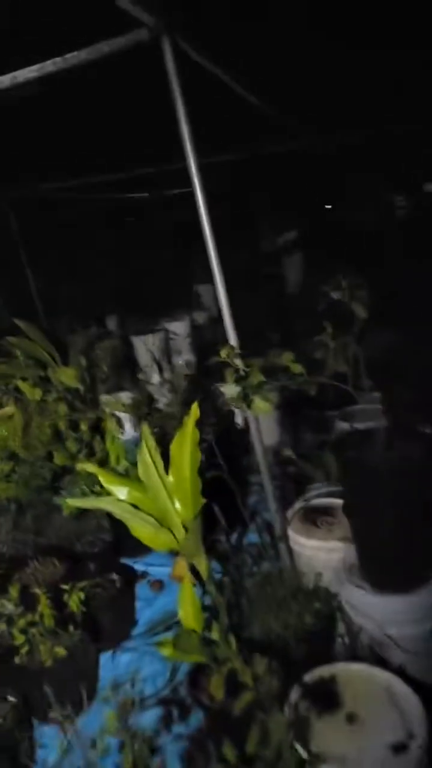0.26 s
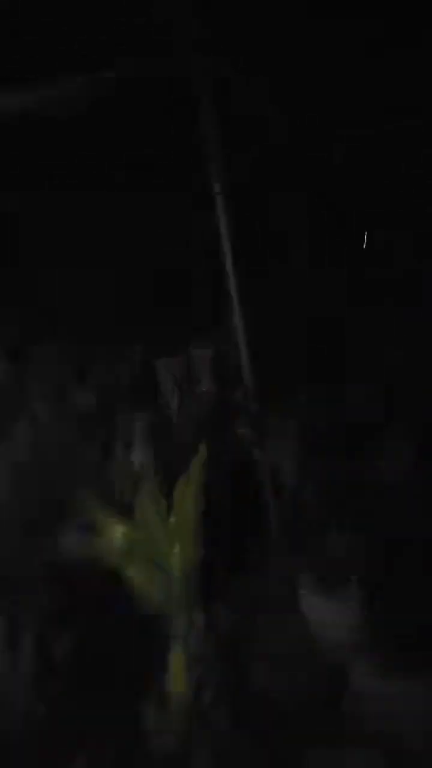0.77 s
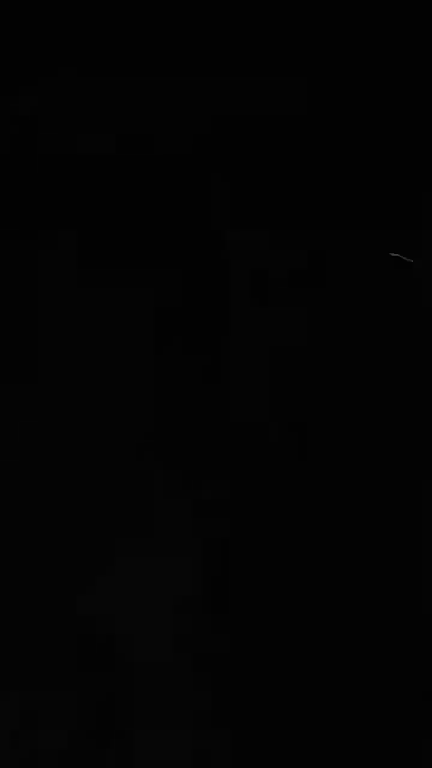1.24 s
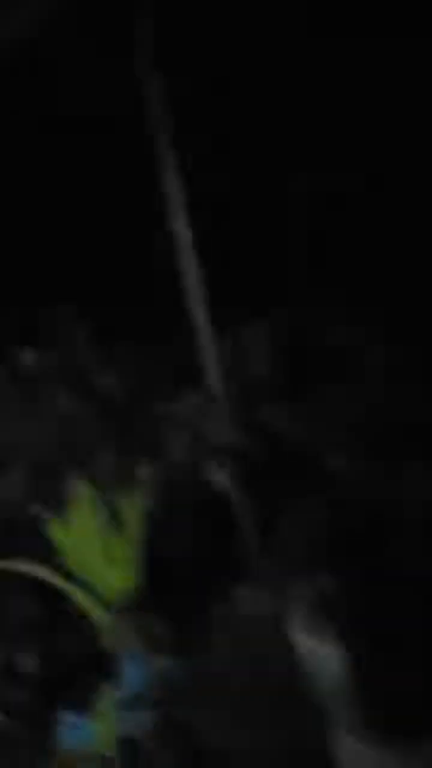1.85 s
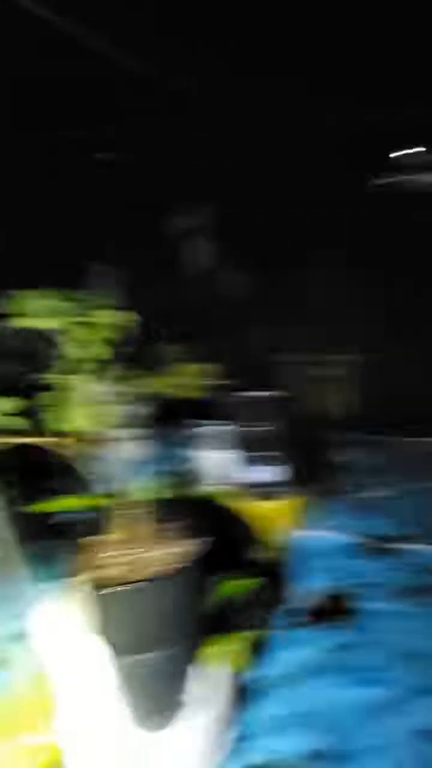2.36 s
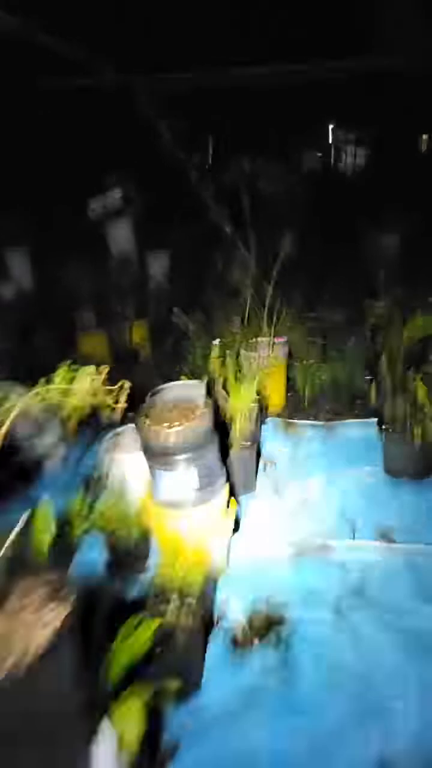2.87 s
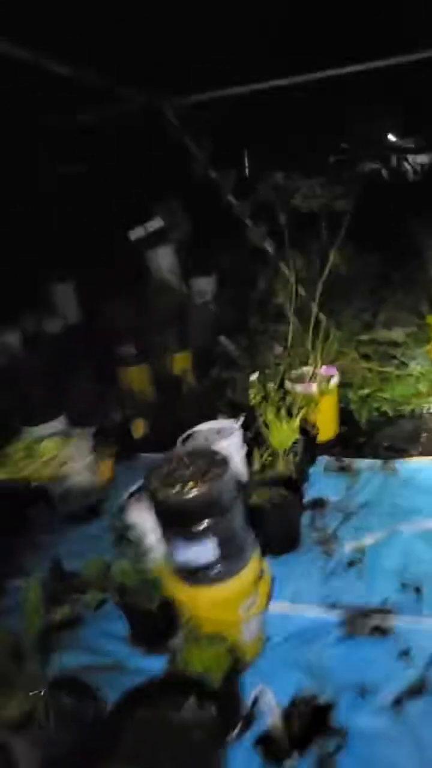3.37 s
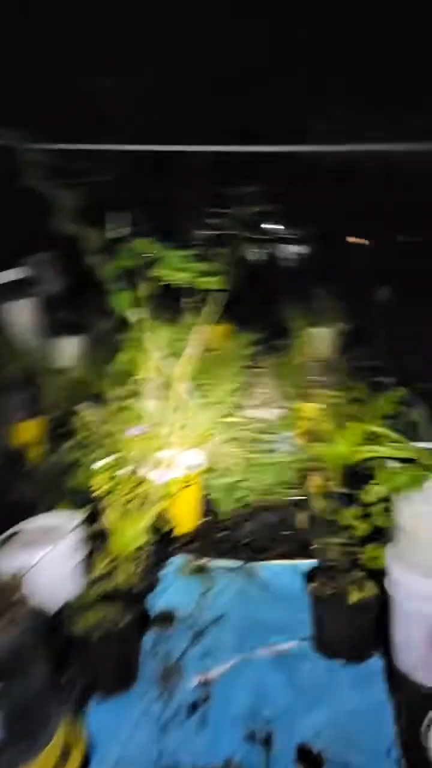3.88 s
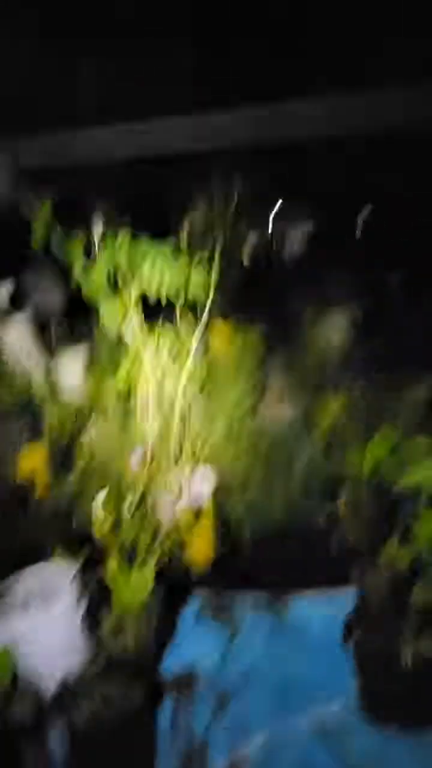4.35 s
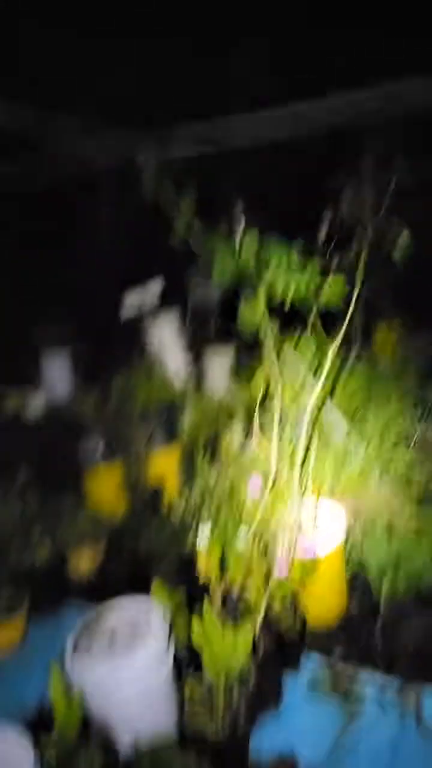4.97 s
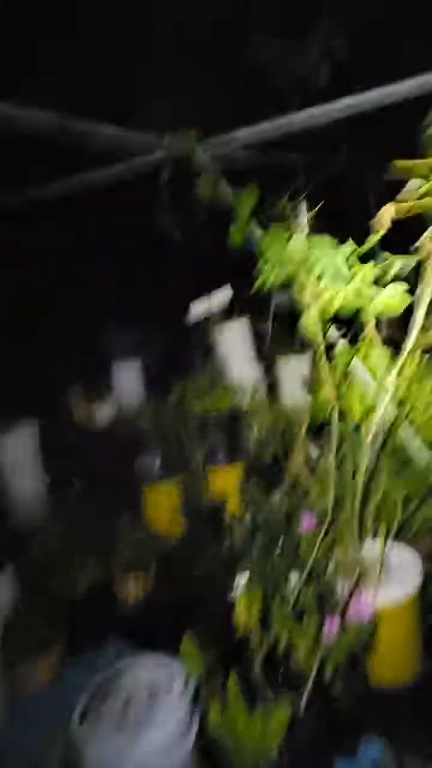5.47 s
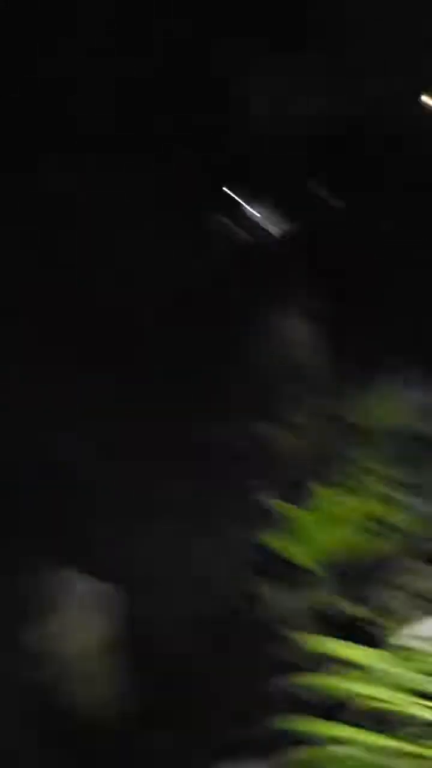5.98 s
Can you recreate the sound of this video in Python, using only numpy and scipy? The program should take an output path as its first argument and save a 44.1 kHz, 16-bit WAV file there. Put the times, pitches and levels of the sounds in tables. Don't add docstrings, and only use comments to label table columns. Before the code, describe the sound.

Outdoors at night, low falling and high rising frog notes ring over shimmering crickets as footsteps crumple plastic sheeting and dry weeds, growing heavier.

```python
import sys
import numpy as np
from scipy import signal
from scipy.fft import rfft, irfft, next_fast_len
from scipy.io import wavfile
from scipy.ndimage import uniform_filter1d, map_coordinates

SR = 44100
rng = np.random.default_rng(int(sys.argv[2]) if len(sys.argv) > 2 else 0)


def master_out(mix):
    frames = np.transpose(np.atleast_2d(mix))
    ceiling = np.clip(frames, -1, 1)
    pcm = np.round(ceiling * 32767).astype(np.int16)
    wavfile.write(sys.argv[1], SR, pcm)


def boost_factor(decibels):
    exponent = np.asarray(decibels, float) / 20
    return 10 ** exponent


N = 274302


def unit(x):
    return x / np.sqrt(np.mean(x ** 2) + 1e-20)


def along(points, hz):
    f, v = np.transpose(points)
    return np.interp(np.log(hz + 1), np.log(f + 1), v)


def curves(rows):
    s, *columns = np.transpose(rows)
    return [np.interp(np.arange(N) / SR, s, column) for column in columns]


def wobble(rate):
    coarse = np.arange(0, N + 32, 32)
    knots = rng.standard_normal(int(N * rate / SR) + 4)
    return np.interp(np.arange(N), coarse, map_coordinates(knots, [coarse * rate / SR]))


def coloured(x, spectrum):
    m = next_fast_len(N + 8192)
    gain = boost_factor(along(spectrum, np.fft.rfftfreq(m, 1 / SR)))
    return unit(irfft(rfft(x, m) * gain, m)[:N])


def laid(starts, rows):
    first = np.round(starts * SR).astype(int)[:, None] - 1
    at = np.clip(first + np.arange(rows.shape[1]), -1, N) % (N + 1)
    return np.bincount(at.ravel(), rows.ravel(), N + 1)[:N]


# frequency in Hz, 60 dB decay time in seconds.
DECAY = [(500, 0.39), (1700, 0.37), (3000, 0.45), (8000, 0.21)]


def garden(x, wet_db):
    out, block = x.copy(), SR // 2
    for start in range(0, N, block):
        hz, t, z = signal.stft(rng.standard_normal(block), SR, nperseg=256)
        decay = boost_factor(-60 * t / along(DECAY, hz)[:, None])
        tail = signal.istft(z * decay, SR, nperseg=256)[1]
        tail = tail / np.linalg.norm(tail)
        wet = signal.fftconvolve(x[start:start + block], tail)[:N - start]
        out[start:start + len(wet)] += boost_factor(wet_db) * wet
    return out


# time in seconds, level in dB.
RUMBLE = [
    (0.0, -50.5),
    (0.43, -49.5),
    (2.82, -53),
    (4.88, -49),
    (6.22, -53.5),
]
# frequency in Hz, level in dB per Hz.
TOWN = [(12, -63), (20, -32), (24, -58), (35, -17.5), (59, 1.5), (92, -7.5), (129, -9.5), (143, -14),
        (152, -21), (220, -36), (290, -58), (480, -120)]
# time in seconds, level in dB.
ENGINE = [
    (0, -46),
    (1.5, -58.5),
    (2.8, -53.5),
    (6.22, -77),
]
# frequency in Hz, level in dB per Hz.
AIR = [(100, -41), (170, -6.5), (500, -18), (1300, -13.5), (2200, -8.5), (3300, -4), (3750, -35),
       (4800, -11.5), (5600, -14.5), (7800, -27), (9800, -27), (10800, -46), (13600, -13.5), (14500, -38),
       (15300, -19.5)]


def night():
    rumble_db = curves(RUMBLE)[0] + 4.5 + 1.3 * wobble(5.6)
    rumble = boost_factor(rumble_db) * coloured(rng.standard_normal(N), TOWN)
    hum_db = curves(ENGINE)[0] + 4.8 * wobble(11.0)
    hum_hz = 126 + 1.54 * wobble(6.22)
    hum = boost_factor(hum_db) * np.sin(2 * np.pi * np.cumsum(hum_hz) / SR)
    air = boost_factor(-51 + 1.1 * wobble(2.3)) * coloured(rng.standard_normal(N), AIR)
    return rumble + hum + air


def trill(count, hz, spread_hz, rate, duty):
    t, song = np.arange(N) / SR, 0
    for pitch_luck, start, rate_luck in rng.standard_normal((count, 3)):
        stroke = (rate * (1 + 0.01986 * rate_luck) * t + start + 0.31 * wobble(5)) % 1
        pulse = np.sin(np.pi * np.clip(stroke / duty, 0, 1))
        pitch = hz + spread_hz * pitch_luck + 35 * wobble(20) - 90 * stroke
        swell = boost_factor(2.74 * wobble(2.38))
        song = song + swell * pulse * np.sin(2 * np.pi * np.cumsum(pitch) / SR)
    return unit(garden(song, wet_db=1.5))


# time in seconds, slow trill in dB, fast trill in dB.
CRICKETS = [
    (0.0, -79, -46.5),
    (0.05, -51.5, -51),
    (5.68, -52, -51),
    (6.22, -54, -56.5),
]
# frequency in Hz, level in dB per Hz.
FAR_CRICKETS = [(3240, -13.5), (5500, -14), (5720, -19), (5930, -1), (6320, 0.5), (6490, -2.5), (6610, -1),
                (6880, 2.5), (7160, -0.5), (7410, -3.5), (7700, -47), (10000, -43), (16900, -120)]


def crickets():
    slow_db, fast_db = curves(CRICKETS)
    slow = boost_factor(slow_db - 1.5) * trill(count=3, hz=6160, spread_hz=45, rate=32.5, duty=0.66)
    fast = boost_factor(fast_db - 2.0) * trill(count=4, hz=7127, spread_hz=110, rate=43.7, duty=0.43)
    hiss_db = fast_db + 0.2 + 0.72 * wobble(12)
    return slow + fast + boost_factor(hiss_db) * coloured(rng.standard_normal(N), FAR_CRICKETS)


# start in seconds, level in dB, settling pitch base in Hz.
BUMPS = [
    (3.123, -40, 106),
    (3.849, -32, 78.5),
    (4.895, -22.5, 91.8),
    (5.172, -34.5, 91),
    (5.617, -40, 211),
]


def bumps():
    t = np.arange(SR // 5) / SR
    s, db, hz = np.transpose(BUMPS)[:, :, None]
    pitch = hz * (0.64 + 1.25 * np.exp(-t / 0.0079))
    phase = 2 * np.pi * np.cumsum(pitch, axis=1) / SR
    return laid(s[:, 0], boost_factor(db - 60 * t / 0.23) * np.sin(phase))


def grains(count, hz, spread, cycles, spread_db):
    u, t = rng.random((count, 3)), np.arange(int(9 * SR / hz)) / SR
    pitch = hz * np.exp(spread * rng.standard_normal((count, 1)))
    size = boost_factor(-spread_db * np.log(np.clip(u[:, 1:2], .06, 1)))
    waves = size * np.exp(-t * pitch / cycles) * np.sin(2 * np.pi * (pitch * t + u[:, 2:]))
    return unit(laid(u[:, 0] * N / SR, waves))


def crunch(cracks, spectrum, smooth, clump_db):
    clumps = boost_factor(clump_db * wobble(30))
    return coloured(clumps * (cracks + smooth * rng.standard_normal(N)), spectrum)


# start in seconds, hold in seconds, force in dB, weeds over sheet in dB.
STEPS = [(0.455, 0.008, -57.5, 3), (1.241, .005, -48.5, -2.5), (2.159, 0.1, -57, 8.5),
         (2.29, 0.059, -48, -3), (2.381, 0.012, -40.5, -7), (2.443, 0.11, -54, -9),
         (2.919, 0.014, -52, 5.5), (2.964, 0.09, -47, -6), (3.074, .02, -47, -15),
         (3.115, 0.012, -37.5, -1), (3.228, 0.22, -53, -18), (3.407, 0.006, -69, 23.5),
         (3.773, 0.053, -43, -8), (3.815, 0.023, -38, -8.5), (3.847, 0.018, -35, -8),
         (3.922, 0.07, -41, -7.5), (4.066, 0.11, -51, -29), (4.408, 0.074, -37, -14.5),
         (4.491, 0.066, -31.5, -14.5), (4.594, 0.12, -41.5, -37), (4.744, 0.24, -51.5, -26),
         (5.164, 0.029, -35, -25), (5.205, 0.024, -39.5, -31), (5.27, 0.065, -44, -25),
         (5.306, 0.033, -39.5, -27), (5.397, 0.52, -48, -17.5), (5.743, 0.084, -38.5, -7.5),
         (5.859, 0.092, -42, -4), (5.987, 0.2, -51, -13)]


def footwork():
    press_db_per_s, lift_db_per_s = 436, 277
    stir_db = -64
    t = np.arange(0, N, 32) / SR
    sheet, weeds = boost_factor(2 * stir_db), boost_factor(2 * stir_db)
    for s, hold, db, weeds_db in STEPS:
        press = press_db_per_s * np.clip(s - t, 0, None)
        lift = lift_db_per_s * np.clip(t - s - hold, 0, None)
        power = boost_factor(2 * (db - press - lift))
        sheet, weeds = sheet + power, weeds + power * boost_factor(2 * weeds_db)
    return [np.interp(np.arange(N) / SR, t, np.sqrt(load)) for load in (sheet, weeds)]


# frequency in Hz, level in dB.
SHEET = [(130, -14.5), (220, -11.5), (600, -7), (1200, -7), (2000, 1.5), (3000, -7.5), (4500, -16),
         (8000, -76)]
WEEDS = [(250, -8), (1200, 4), (2200, 5.5), (3500, -2.5), (5500, -2), (7400, -4), (8200, -44), (12000, -43)]
SCUFF = [(6500, -39), (8200, -4), (9800, -2), (11500, 2), (13000, 10), (14500, -12), (16000, -13)]
# time in seconds, level in dB.
BRUSHING = [
    (5.66, -65),
    (5.8, -51.5),
    (6.05, -56.5),
    (6.22, -54.5),
]


def steps():
    on_sheet, on_weeds = footwork()
    folds = grains(count=3000, hz=900, spread=.7, cycles=2.2, spread_db=2.1)
    stalks = grains(count=6000, hz=3784, spread=0.35, cycles=2.0, spread_db=4.5)
    grit = grains(count=6000, hz=10900, spread=0.24, cycles=0.85, spread_db=-1.0)
    sheet = boost_factor(-0.54) * on_sheet * crunch(folds, SHEET, smooth=0.48, clump_db=2.5)
    weeds = boost_factor(6.0) * on_weeds * crunch(stalks, WEEDS, smooth=1.0, clump_db=1.3)
    scuff = boost_factor(-28.5) * on_weeds ** 0.67 * crunch(grit, SCUFF, smooth=1.0, clump_db=2.0)
    leaf_tone = [(8000, -43), (9000, -11), (10000, -7.5), (11000, -26)]  # (Hz, dB)
    leaf = boost_factor(curves(BRUSHING)[0]) * coloured(rng.standard_normal(N), leaf_tone)
    return sheet + weeds + scuff + leaf


# start in seconds, peak in dB, pitch in Hz.
SNAPS = [(0.446, -24.5, 980), (1.2607, -24.5, 660), (2.196, -26, 2300), (2.336, -26, 2400),
         (2.3942, -21, 1300), (2.3974, -18.5, 830), (2.4126, -26, 1200), (2.507, -19.5, 980),
         (2.983, -23, 1600), (3.0081, -20, 1100), (3.1226, -14, 1230), (3.6497, -19.5, 2040),
         (3.785, -11.5, 1520), (3.8561, -8, 1530), (3.9505, -20, 855), (3.9723, -19, 1470),
         (4.023, -18, 1110), (4.4875, -16.5, 724), (4.502, -12, 835), (4.522, -13.5, 1380),
         (4.533, -17, 1490), (4.5115, -17, 900), (4.5485, -15, 1270), (4.5592, -15, 1130),
         (4.593, -19.5, 810), (4.638, -11, 1300), (4.6905, -16, 970), (4.8367, -29, 1800),
         (5.1663, -14.5, 960), (5.1796, -15, 770), (5.2168, -22, 920), (5.3068, -22.5, 880),
         (5.7992, -18, 1980), (5.918, -15.5, 1600), (6.075, -12.5, 1510),
         (0.472, -31, 890), (1.535, -29.5, 1270), (2.293, -30, 1100), (2.314, -35, 1100),
           (2.335, -31, 1000), (2.375, -41, 1100), (2.389, -29, 480), (2.4432, -21, 1150), (2.46, -29, 960),
           (3.056, -23, 644), (3.086, -25, 1200), (3.11, -20, 1380), (3.131, -20, 500), (3.142, -27, 1700),
           (3.159, -18, 1490), (3.364, -22.5, 1288), (3.409, -29, 1400), (3.776, -18, 1290),
           (3.8131, -13.5, 1420), (3.826, -19, 2060), (3.850, -16, 1480), (3.870, -24, 594),
           (3.903, -22, 1200), (3.915, -24, 547), (3.991, -24, 1520), (4.0876, -21, 1160),
           (4.3655, -21, 1350), (4.404, -23, 730), (4.4163, -18, 1550), (4.436, -26, 1440),
           (4.457, -19, 647), (4.465, -24, 1890), (4.544, -18, 1180), (4.569, -33, 790), (4.604, -29, 1700),
           (4.6733, -25, 1180), (5.1386, -28, 780), (5.159, -27, 2050), (5.203, -30, 1060),
           (5.282, -26, 540), (5.3205, -22.5, 810), (5.3594, -20, 1050), (5.421, -27, 940),
           (5.4435, -27, 720), (5.48, -33, 1500), (5.518, -25, 880), (5.537, -26, 1100),
           (5.575, -28.5, 593), (5.727, -27.5, 400), (5.744, -18, 2080), (5.752, -16.5, 1400),
           (5.766, -24, 1270), (5.780, -27, 2100), (5.8178, -16, 1400), (5.844, -16.5, 1510),
           (5.876, -21, 1410), (5.904, -26.5, 400), (5.97, -20, 1200), (6.0712, -15, 1770)]


def snaps():
    rise_cycles, ring_cycles = 0.5, 8.44
    t = np.arange(SR // 40) / SR
    s, db, hz = np.transpose(SNAPS)[:, :, None]
    g = rng.standard_normal((len(s), 4))
    shape = (1 - np.exp(-(t * hz / rise_cycles) ** 2)) * boost_factor(-60 * t * hz / ring_cycles)
    ring = np.sin(2 * np.pi * (hz * t + g[:, 2:3]))
    upper_hz = hz * (1.5 + .15 * g[:, 1:2])
    upper = boost_factor(-4 + 2.5 * g[:, :1]) * np.sin(2 * np.pi * (upper_hz * t + g[:, 3:]))
    crack = boost_factor(-13 - 60 * t / 0.0075) * rng.standard_normal((len(s), len(t)))
    dull = signal.sosfilt(signal.butter(2, 4500, fs=SR, output="sos"), crack)
    return laid(s[:, 0] - .0006, boost_factor(db - 0.27) * (shape * (ring + upper) + dull))


# start in seconds, peak in dB, half width in seconds.
TICKS = [(0.13, -40, 0.015), (2.3136, -35, .006), (2.924, -33, .016), (2.937, -25.5, 0.006),
         (3.1, -35, .004), (3.12, -37, .02), (3.404, -29, 0.0014), (3.411, -27, .004), (3.495, -41, .005),
         (3.646, -31, .002), (3.676, -32, .004), (3.741, -30, 0.0018), (3.765, -39, .012),
         (3.8741, -27, 0.0064), (4.4782, -41, .005), (4.5012, -30, .005), (4.6364, -37, .005),
         (5.1761, -38, .005), (5.7882, -32, .008), (5.9155, -30, .006)]


def ticks():
    s, db, width = np.transpose(TICKS)[:, :, None]
    t = np.arange(SR // 20) / SR
    swell = np.exp(-((t - .024) / width) ** 2)
    bright = signal.butter(4, 8500, "high", fs=SR, output="sos")
    brush = signal.sosfilt(bright, rng.standard_normal((len(s), len(t))))
    return laid(s[:, 0] - .02, boost_factor(db - 11.5) * swell * brush)


def whistles(notes, bend, flutter_db):
    s, length, start_hz, end_hz, db = np.transpose(notes)[:, :, None]
    t = np.arange(SR // 7) / SR
    u = np.clip(t / length, 0, 1)
    pitch = start_hz + (end_hz - start_hz) * (1 - (1 - u) ** bend)
    phase = 2 * np.pi * np.cumsum(pitch, axis=1) / SR
    attack = np.clip(t / 0.0026, 0, 1)
    release = np.clip((length - t) / 0.0096 + 1, 0, 1)
    edges = attack * release * (1 - 0.31 * u)
    return laid(s[:, 0] - .002, boost_factor(db) * edges * np.sin(phase)) * boost_factor(flutter_db * wobble(90))


def far_notes(count, length, top_hz, spread_hz, glide_hz):
    u, g = rng.random((count, 3)), rng.standard_normal((count, 2))
    s = (np.arange(count) + 2 * u[:, 0]) / count * N / SR - .1
    lengths = length * (0.591 + 0.821 * u[:, 1])
    end_hz = top_hz + spread_hz * np.clip(g[:, 0], -2, 2)
    start_hz = end_hz - glide_hz * (.5 + u[:, 2])
    db = 2.44 * np.clip(g[:, 1], -2, .7)
    return np.transpose([s, lengths, start_hz, end_hz, db])


# time in seconds, low notes in dB, high notes in dB.
FAR_FROGS = [(0.0, -47, -46), (0.9, -45, -45), (1.8, -45, -46.5), (2.8, -44.5, -45), (3.3, -46.5, -47.5),
             (4.0, -46.5, -43), (4.5, -39, -43.5), (4.95, -55, -44.5), (5.3, -46.5, -49.5),
             (5.67, -44, -45), (6.22, -44.5, -38.5)]


def far_frogs():
    low_db, high_db = curves(FAR_FROGS)
    low_notes = far_notes(count=380, length=0.0787, top_hz=1660, spread_hz=85, glide_hz=-70)
    high_notes = far_notes(count=480, length=.08, top_hz=3113, spread_hz=140, glide_hz=382.9)
    low = unit(whistles(low_notes, bend=0.98, flutter_db=3.5))
    high = unit(whistles(high_notes, bend=1.6, flutter_db=4.0))
    return garden(boost_factor(low_db - 9) * low + boost_factor(high_db - 7.5) * high, wet_db=6)


# start in seconds, length in seconds, start pitch in Hz, peak in dB.
BIG_FROGS = [(0.005, 0.065, 1634, -42.5), (0.074, 0.054, 1574, -37), (0.265, 0.057, 1660, -33.5),
             (0.4, 0.022, 1660, -38), (0.554, 0.05, 1626, -37.5), (0.79, 0.035, 1737, -46.5),
             (0.868, 0.061, 1690, -46), (1.069, 0.088, 1608, -43), (1.173, 0.036, 1640, -41.5),
             (1.248, 0.054, 1705, -41), (1.529, 0.04, 1688, -37), (1.744, 0.065, 1682, -36),
             (1.895, 0.058, 1563, -40.5), (2.039, 0.043, 1743, -35.5), (2.107, 0.052, 1660, -39),
             (2.196, 0.082, 1659, -39.5), (2.318, 0.098, 1753, -42), (2.476, 0.054, 1620, -39.5),
             (2.579, 0.026, 1640, -42.5), (2.8, 0.044, 1594, -41.5), (2.905, 0.031, 1706, -37),
             (3.094, 0.044, 1668, -37), (3.501, 0.077, 1570, -38), (3.442, 0.064, 1642, -49),
             (4.146, 0.068, 1660, -43), (4.328, 0.064, 1686, -49), (3.942, 0.042, 1563, -36.5),
             (4.07, 0.046, 1664, -35), (4.655, 0.093, 1618, -40), (4.775, 0.032, 1703, -33.5),
             (4.83, 0.052, 1734, -44), (5.002, 0.047, 1609, -36.5), (5.274, 0.031, 1700, -34.5),
             (5.351, 0.075, 1888, -40.5), (5.685, 0.036, 1724, -40), (5.593, 0.04, 1654, -38.5)]
# start in seconds, start pitch in Hz, peak in dB.
SMALL_FROGS = [(0.359, 1930, -44), (1.013, 1935, -41.5), (1.135, 1900, -42.5), (1.696, 1950, -41.5),
               (2.631, 1967, -38.5), (3.468, 1848, -39.5), (3.612, 1830, -40.5), (4.092, 1940, -42),
               (4.171, 1883, -38), (4.74, 1860, -32), (4.648, 1940, -41), (4.772, 1957, -36.5),
               (5.383, 1956, -34.5), (5.876, 1900, -34), (5.956, 1870, -36), (5.986, 1970, -44),
               (6.048, 1913, -42), (6.164, 1777, -37)]
# start in seconds, length in seconds, top pitch in Hz, peak in dB.
LONG_NOTES = [(0.194, 0.0525, 3025, -45.5), (0.495, 0.057, 2883, -48), (0.497, 0.078, 3230, -36.5),
              (0.694, 0.13, 2933, -43.5), (1.351, 0.11, 2917, -43), (1.634, 0.088, 2960, -39),
              (1.992, 0.065, 3170, -47), (2.787, 0.057, 2835, -43.5), (3.075, 0.07, 3060, -41),
              (3.405, 0.068, 3130, -40), (3.691, 0.077, 3230, -40), (3.711, 0.042, 2924, -36),
              (4.115, 0.05, 3024, -40), (4.36, 0.0393, 3290, -40), (4.235, 0.018, 2900, -39),
              (4.651, 0.029, 3140, -38.5), (4.719, 0.04, 3130, -35), (4.93, 0.07, 3070, -37),
              (4.89, 0.082, 3097, -35.5), (4.971, 0.055, 2936, -39.5), (5.05, 0.06, 3290, -42.5),
              (5.191, 0.14, 3046, -38), (5.273, 0.051, 3150, -55), (5.484, 0.066, 3173, -41),
              (5.496, 0.09, 2887, -36.5), (5.53, 0.0385, 3200, -35), (5.874, 0.082, 3340, -46)]
# start in seconds, top pitch in Hz, peak in dB.
QUICK_NOTES = [(0.113, 3000, -43.5), (0.401, 3000, -45), (0.434, 2954, -39), (0.788, 3000, -39),
               (1.329, 3170, -40), (1.039, 3010, -37), (1.083, 3334, -41), (1.724, 3060, -37),
               (1.751, 3000, -36), (1.955, 3022, -36), (2.199, 2940, -42.5), (2.43, 3130, -34),
               (2.685, 3044, -37.5), (2.739, 3070, -39), (4.331, 3277, -37), (4.8, 3098, -31.5),
               (4.832, 3070, -42), (5.395, 2927, -42), (5.461, 2950, -37), (5.838, 3253, -33.5),
               (6.011, 3080, -31), (6.042, 3110, -41), (6.147, 3256, -39)]
# start and length in seconds, start and end pitch in Hz, peak in dB.
STRAY_NOTES = [
    (1.233, 0.021, 3410, 3610, -47.5),
    (1.243, 0.011, 3640, 5440, -46),
]


def near_frogs():
    big_sag_hz_per_s, small_sag_hz_per_s, small_s = 800, 3350, 0.028
    rise_hz, rise_hz_per_s = 163.8, 2300
    quick_rise_hz, quick_s = 400, 0.042
    first = [(s, length, hz, hz - big_sag_hz_per_s * length, db) for s, length, hz, db in BIG_FROGS]
    first += [(s, small_s, hz, hz - small_sag_hz_per_s * small_s, db) for s, hz, db in SMALL_FROGS]
    second = [(s, length, hz - rise_hz - rise_hz_per_s * length, hz, db) for s, length, hz, db in LONG_NOTES]
    second += [(s, quick_s, hz - quick_rise_hz, hz, db) for s, hz, db in QUICK_NOTES]
    falling = whistles(first, bend=0.82, flutter_db=2.2)
    rising = whistles(second + STRAY_NOTES, bend=1.6, flutter_db=0.6)
    return boost_factor(1.0) * garden(falling + rising, wet_db=-2.0)


def scene():
    underfoot = garden(steps() + snaps() + ticks(), wet_db=-13.5)
    return (night() + crickets() + bumps() + underfoot + far_frogs() + near_frogs())[None]


# frequency in Hz, share of time from 0 to 1.
STARVED = [(3400, 0), (3650, .45), (4000, .33), (4400, .16), (5200, .1), (5500, .2), (5800, 0), (7550, 0),
           (7800, .1), (8300, 0), (10150, 0), (10500, .42), (11000, .25), (11800, 0)]


def starve(x):
    top_hz, bins = 15750, 4
    hz, t, z = signal.stft(x, SR, nperseg=1024)
    hz = hz[:-1]
    energy = uniform_filter1d(np.abs(z[:-1]) ** 2, size=10, axis=1)
    mask = energy[(hz > 2500) & (hz < 3300)].sum(axis=0) ** 0.25
    power = energy.reshape(-1, bins, len(t)).sum(axis=1) / mask
    rank = power.argsort(axis=1).argsort(axis=1) / len(t)
    rank = np.repeat(rank, bins, axis=0)
    z[:-1] *= (rank >= along(STARVED, hz)[:, None]) & (hz < top_hz)[:, None]
    return signal.istft(z, SR, nperseg=1024)[1][:N]


def roll_off(x):
    return signal.sosfilt(signal.butter(12, 16150, fs=SR, output="sos"), x)


def record(dry):
    mix = starve(dry[0])[None]
    return roll_off(mix)


dry = scene()
out = record(dry)
master_out(out)
```